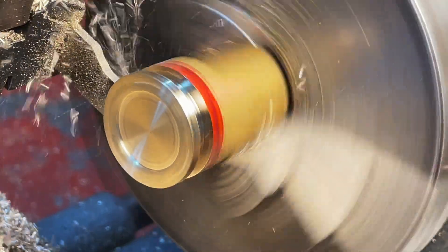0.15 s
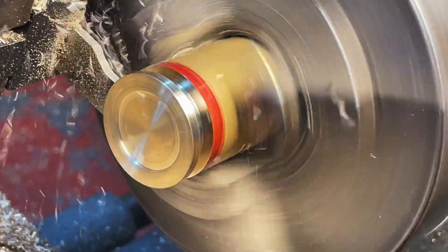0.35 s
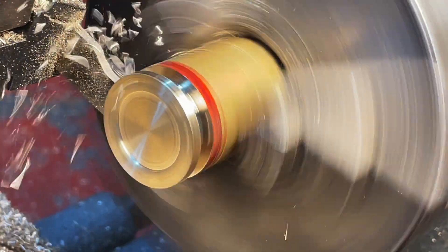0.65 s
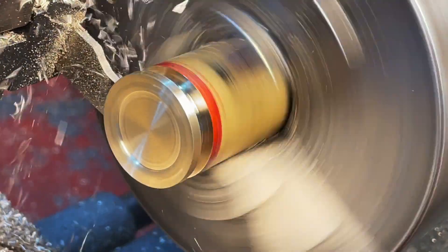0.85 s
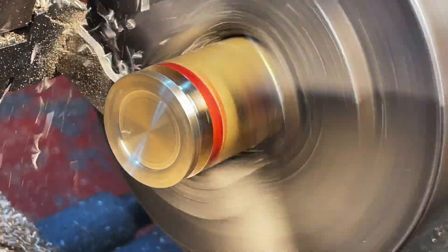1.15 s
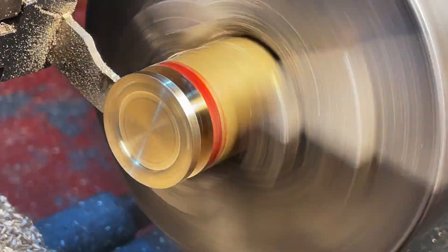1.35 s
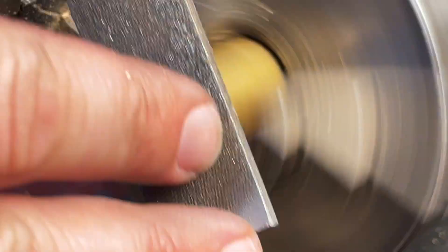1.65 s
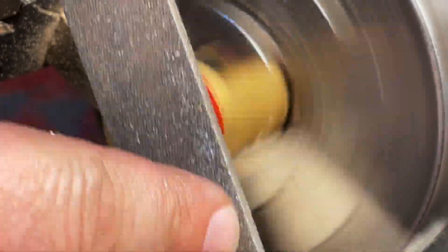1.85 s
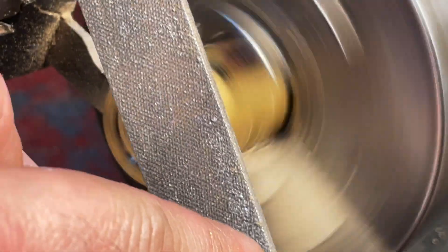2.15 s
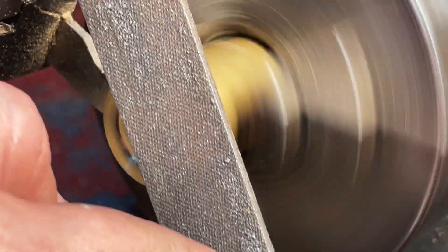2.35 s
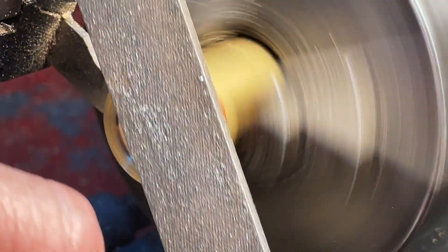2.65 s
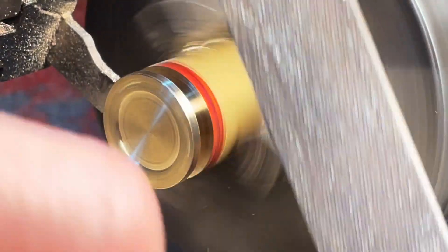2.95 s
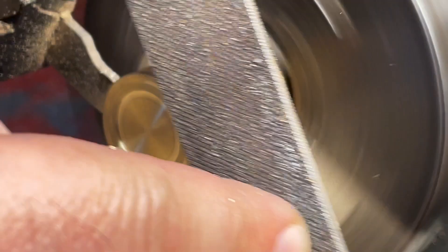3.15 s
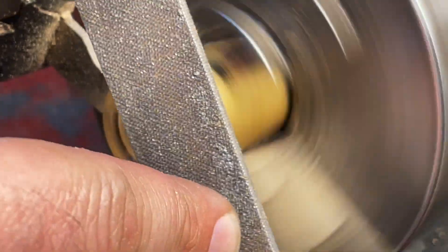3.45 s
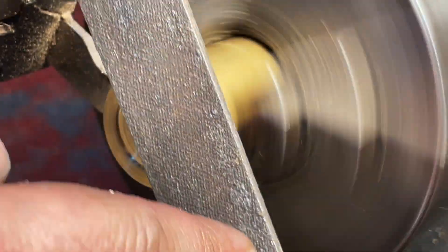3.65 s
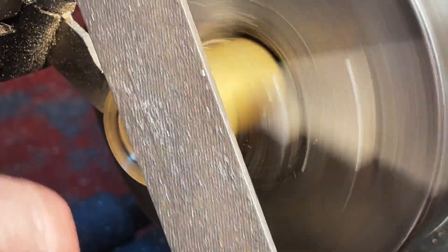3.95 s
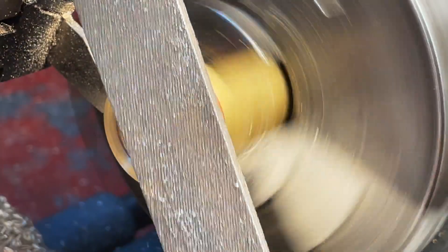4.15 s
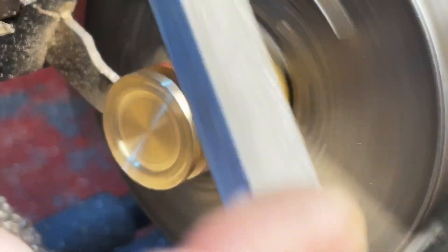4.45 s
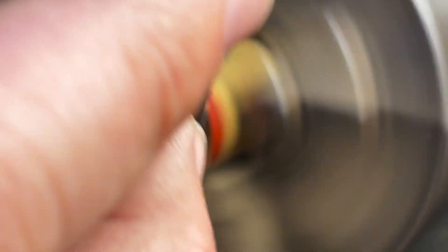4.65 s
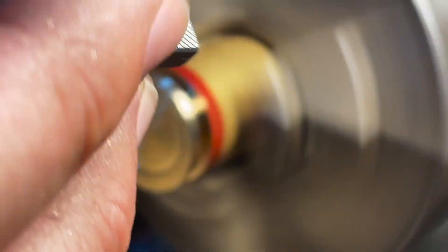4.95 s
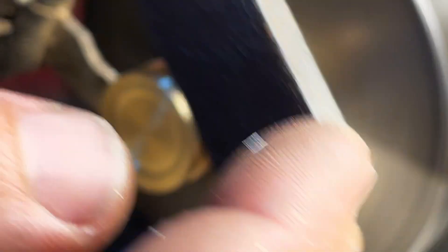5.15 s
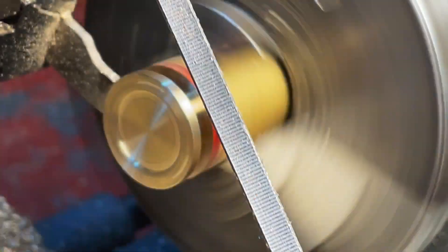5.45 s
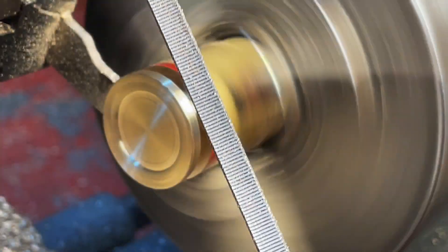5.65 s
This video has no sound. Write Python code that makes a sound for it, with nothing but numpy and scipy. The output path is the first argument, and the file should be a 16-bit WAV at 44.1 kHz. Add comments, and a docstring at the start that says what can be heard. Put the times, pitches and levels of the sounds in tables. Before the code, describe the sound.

Close up, a small lathe cuts a brass bar with a rapid juddering scrape, crackling chips and sputtering high squeal. At about 1.2 seconds the cutting stops abruptly. The machine runs on, humming and rumbling in pulses, with hard loose knocks, motor ticks and a thin whine. A fingertip brushes softly, then a file hisses twice, with brief steel clinks. Close stereo microphone in a workshop.

```python
"""A small metal lathe, close by. First a tool cuts a brass bar: juddering bites shape scraping noise about
32 times a second, snapping chips set off resonances, and the tool tip squeals as noise plus a wandering tone.
The cutting sound stops abruptly and the machine is heard alone: close tones beat as hum and rumble, the slack
drive knocks in short bursts, the motor ticks and whines over bearing noise. A fingertip brushes the bar in a soft
puff of noise; later a file is laid on twice with a fine, grainy hiss, and now and then struck steel rings."""
import sys
import numpy as np
from scipy import signal
from scipy.fft import rfft, irfft
from scipy.io import wavfile
from scipy.ndimage import uniform_filter1d

SR = 44100
rng = np.random.default_rng(int(sys.argv[2]) if len(sys.argv) > 2 else 0)


def persist_wave(psi):
    """Save psi, clipped to +-1, as 16-bit WAV."""
    counts = np.round(np.clip(psi, -1, 1) * 32767).astype(np.int16)
    wavfile.write(sys.argv[1], SR, np.atleast_2d(counts).T)


N = 255780
TIME = np.arange(N) / SR
FREQS = np.maximum(np.fft.rfftfreq(N, 1 / SR), 1)

# Table levels are taken before the gain of their layer; mode widths are noise bandwidths.
# scraping of the cut, heavy at first, easing and then biting again: (time [s], level [dB])
SCRAPE_LEVEL = [(0.0, -37), (0.165, -35.5), (0.195, -40), (0.28, -38.5), (0.34, -46), (0.448, -45),
                (0.535, -38.5), (1.085, -37.5), (1.132, -43.5), (1.168, -38), (1.21, -40.5)]
# colour of the scraping: (frequency [Hz], density [dB per Hz])
SCRAPE_COLOUR = [(130, -19), (185, -13), (218, 5.5), (250, -5), (285, -1), (340, -9.5), (500, -8.5),
                 (640, -5), (740, -10.5), (900, -6), (1150, -11.5), (1350, -12), (1650, -13), (2050, -13),
                 (3250, -24), (3850, -15), (5300, -26.5), (9000, -28), (11200, -26), (14000, -24.5)]
# drone of the frame under the cut: (time [s], level [dB])
DRONE_LEVEL = [(0.0, -38), (0.148, -38.5), (0.352, -41.5), (0.818, -35.5), (1.21, -40)]
# partials of the drone: (multiple of the judder, level [dB])
DRONE_PARTIALS = [(1, -42), (2, -33), (3, -15), (4, -13), (5, -2.5), (6, -24), (7, 2), (8, -18), (9, 0),
                  (10, -10.5), (11, -21), (12, -21), (13, -11.5), (14, -20.5)]
# a second bite halfway through the judder: (time [s], strength [0-1])
SECOND_BITE = [(0, 0.85), (.25, 0.4), (.5, 0.2)]
# extra level of some bites, from none to a few dB: (time [s], extra level [dB])
BITE_EXTRA = [(0.54, 1.5), (0.571, 1), (0.633, 0), (0.818, 2.5), (0.88, 2), (0.911, 3.5), (1.003, 3),
              (1.095, 1.5)]
# ringing of the tool post: (frequency [Hz], level [dB], t60 [s])
POST_MODES = [(410, -11, 0.06), (540, -5, 0.044), (636, 5.5, 0.039), (826, -2.5, 0.04), (912, -2, 0.07),
              (1314, 0.5, 0.042)]
# flank of the tool, rubbing on even where the cut eases: (frequency [Hz], width [Hz], level [dB])
FLANK_MODES = [(8950, 350, 10), (10270, 660, -3.5), (13500, 1100, -3)]
# crackle of the chips: (time [s], level [dB])
CHIP_LEVEL = [(0.0, -52), (0.03, -44), (0.246, -42), (0.35, -50), (0.444, -59), (0.538, -45.5),
              (0.768, -51), (0.824, -44), (0.828, -45), (1.186, -42.5), (1.21, -42)]
# resonances that the breaking chips set off: (frequency [Hz], width [Hz], level [dB])
CHIP_MODES = [(3808, 120, 7.5), (4350, 550, -0.5), (5700, 870, -3.5), (7260, 420, -1), (9900, 580, 5),
              (13600, 1200, -5.5)]
# thick chips snapping off: (time [s], peak [dB])
SNAPS = [(0.0313, -28.5), (0.064, -32), (0.1077, -31), (0.161, -35), (0.2028, -30), (0.247, -30),
         (0.2637, -30), (0.3855, -37), (0.4778, -34), (0.5407, -35), (0.5701, -37), (0.7552, -36),
         (0.7883, -30), (0.8175, -27), (0.8485, -37), (0.8792, -35), (0.913, -31), (1.0021, -29),
         (1.098, -28), (1.1743, -29), (1.187, -32)]
# squeal of the tool tip, flaring when a chip catches: (time [s], level [dB])
SQUEAL_LEVEL = [(0.0, -45), (0.046, -48), (0.084, -36), (0.11, -41), (0.116, -34.5), (0.13, -46),
                (0.148, -32.5), (0.217, -34), (0.232, -38.5), (0.262, -37), (0.278, -31), (0.31, -41.5),
                (0.322, -35.5), (0.33, -43.5), (0.416, -50.5), (0.43, -59), (0.552, -45), (0.582, -49),
                (0.684, -42), (0.706, -50), (0.784, -52), (0.792, -44), (0.852, -43.5), (1.01, -36.5),
                (1.054, -43.5), (1.138, -33), (1.148, -42.5), (1.21, -40)]
# the squeal shifts with the load on the tip: (time [s], frequency [Hz])
SQUEAL_PITCH = [(0.0, 6840), (0.12, 6850), (0.16, 6790), (0.21, 6730), (0.28, 6800), (0.35, 6760),
                (0.65, 6900), (1.0, 6810), (1.21, 6910)]
# resonances of the tool tip: (frequency [Hz], width [Hz], level [dB])
TOOL_MODES = [(4540, 1240, -28), (6440, 84, -8), (6730, 63, -4), (6700, 53, -1), (6870, 140, -2),
              (7100, 220, -3), (7500, 300, -6.5), (7800, 330, -13), (8280, 260, -28), (8980, 200, -3),
              (9300, 400, -22), (12600, 350, -19), (13340, 710, -14), (14200, 700, -28)]
# knocks that stand out: (time [s], level [dB], level above 2 kHz [dB], level below 900 Hz [dB],
# strength of the bounces [0-1])
HARD_KNOCKS = [(1.3865, -38, -55, -57, 0.7), (1.4404, -41.5, -46, -43, 0.8),
               (1.5344, -35.5, -44.5, -44, 0.8), (1.6951, -39.5, -57, -53, 0.5),
               (1.8343, -41, -57, -55, 0.5), (1.8653, -33.5, -45.5, -47, 0.9),
               (1.9261, -32.5, -44.5, -44, 0.8), (1.999, -39, -51, -44, 0.7), (2.074, -37, -49.5, -46, 0.9),
               (2.163, -39.5, -52, -56, 0.5), (2.237, -38.5, -56, -52, 0.5), (2.315, -43, -43, -52, 0.4),
               (2.325, -35, -56, -58, 0.2), (2.3569, -32.5, -50, -44, 1), (2.5054, -35, -49.5, -52, 0.6),
               (2.6443, -36, -54, -45, 1), (2.804, -35.5, -43, -51, 0.46), (2.8675, -35, -46, -56, 0.9),
               (2.9647, -36, -46, -46, 1), (3.255, -36.5, -45, -50, 0.7), (3.475, -37, -59, -51, 0.6),
               (3.595, -38.5, -52, -56, 0.65), (3.6142, -35, -51.5, -46, 0.5),
               (3.7457, -37, -54.5, -52, 0.6), (3.8024, -40, -45, -50, 0.8), (3.873, -36, -52, -59, 0.7),
               (3.8936, -33.5, -40, -50, 0.55), (4.0916, -31, -48, -39, 0.8),
               (4.202, -39.5, -58, -51, 0.55), (4.3505, -36, -41, -41, 0.6), (4.414, -32, -48, -48, 0.7),
               (4.5121, -36, -61, -47, 0.6), (4.565, -36, -55, -38, 0.54), (4.691, -31, -49, -43, 0.7),
               (4.7443, -34, -47, -48, 0.3), (4.8309, -30.5, -50, -51, 0.4), (4.897, -42, -51, -55, 0.4),
               (4.9829, -34, -44, -52.5, 0.5), (5.044, -37, -47, -49.5, 0.6),
               (5.1326, -37.5, -40.5, -53, 0.5), (5.1621, -35, -47.5, -46, 0.7),
               (5.1921, -30.5, -44, -32.5, 0.5), (5.28, -33.5, -49, -46, 1),
               (5.371, -34.5, -41.5, -40, 0.7), (5.471, -36.5, -55.5, -58, 0.5),
               (5.5027, -35.5, -42, -52, 0.8), (5.5324, -37.5, -43, -39, 0.5),
               (5.6201, -32.5, -43, -53, 0.4), (5.6503, -35, -57, -42, 0.6), (5.6833, -34.5, -44, -38, 0.9),
               (5.7698, -37, -44, -51, 0.6)]
# resonances of the headstock: (frequency [Hz], width [Hz], level [dB])
KNOCK_MODES = [(552, 120, -1), (841, 82, 2), (1070, 73, -1), (1271, 118, 3), (1505, 250, -3),
               (1880, 130, -0.5), (2252, 370, -6.5), (2850, 420, -13), (4310, 740, -15.5)]
# strokes of the file: (start [s], loudest [s], end [s], level when loudest [dB],
# rise [dB per s], fall [dB per s])
STROKES = [(2.209, 2.708, 2.79, -50.5, 33, 270), (3.519, 4.0, 4.145, -50, 17, 65)]
# the louder colour of the file hiss: (frequency [Hz], density [dB per Hz])
LOUD_HISS_COLOUR = [(3000, -38), (4300, -6), (6000, -10), (8000, -12), (10000, -2), (12000, -23),
                    (12800, -5), (13400, -13), (13900, 4), (14500, 2), (15600, -2)]
# the fainter colour of the file hiss: (frequency [Hz], width [Hz], level [dB])
FAINT_HISS_MODES = [(5950, 3200, -14.5), (13740, 920, 1)]
# the blade of the file humming along: (frequency [Hz], width [Hz], level [dB])
BLADE_MODES = [(276, 31, -1.5), (398, 110, -7)]
# bumps of a steel tool: (time [s], click level [dB])
CLINKS = [(2.3575, -44.5), (2.965, -47.5), (4.691, -47), (5.191, -37)]
# ringing of the steel tool: (frequency [Hz], level [dB], t60 [s])
STEEL_MODES = [(418, -8.5, 0.18), (577, 0, 0.03), (818, 0.5, 0.036), (1310, -12, .04), (1985, -5.5, 0.18)]
# mains hum and the turning parts that beat against it: (frequency [Hz], level [dB])
HUM = [(100.1, 0), (106.49, -5), (109.94, -11), (112.88, -14), (107.9, -13), (92.3, -16), (96.75, -17),
       (103.4, -18)]
# close tones of the low rumble: (frequency [Hz], level [dB])
RUMBLE = [(50.75, -2), (54.68, 0), (75.3, -14), (74.2, -16)]
# the rumble rolls unevenly: (time [s], level [dB])
RUMBLE_LEVEL = [(1.38, -43), (1.65, -47), (1.92, -41), (2.42, -41.5), (2.66, -41.5), (2.92, -46.5),
                (3.15, -39), (3.42, -41), (3.7, -46), (3.98, -42.5), (4.45, -47), (4.8, -42.5),
                (5.2, -44.5), (5.5, -39.5), (5.75, -43)]
# faint overtones of the motor and the mains: (frequency [Hz], level against the hum [dB])
OVERTONES = [(124.9, -20), (131.3, -23), (200.3, -22), (213, -24), (225.3, -21), (300.4, -25)]
# resonances of the bed and guards: (frequency [Hz], width [Hz], level [dB])
FRAME_MODES = [(30, 14, -12.5), (83, 22, 1.5), (105, 7.8, -8.5), (146, 26, -1), (219.3, 28.4, 1),
               (289, 23, -8), (408.6, 30.5, -8), (824, 87, -14.5)]
# colour of the bearing noise: (frequency [Hz], density [dB per Hz])
BEARING_COLOUR = [(300, -1), (400, -8.5), (550, -3), (830, 0), (1050, -7.5), (1300, -5.5), (2000, -13),
                  (2900, -17), (4300, -18), (4900, -22), (5700, -18), (7500, -19.5), (10000, -23.5),
                  (11000, -35.5), (12500, -38), (15500, -44)]
# whine of the motor drive: (frequency [Hz], level [dB], side tone share [gain], flutter [rad])
WHINE = [(4369.6, -64.5, .75, .3), (5462, -63, .28, .65), (6554.4, -73.5, .55, .5)]
# ticks of the motor that stand out: (time [s], peak [dB])
HARD_TICKS = [(1.529, -57), (1.6305, -51.0), (1.6858, -52), (1.7259, -50), (1.7661, -44), (1.8067, -51),
              (1.8867, -50.0), (2.0692, -49.5), (2.3283, -54), (2.7746, -50), (2.8546, -53),
              (2.8946, -50.0), (2.9346, -45), (3.0155, -50), (3.055, -51), (3.135, -48.5), (3.9829, -52),
              (4.1029, -48.0), (4.1838, -52), (4.2625, -50.5), (4.287, -48.0), (4.304, -54), (4.3441, -50),
              (4.3848, -47), (4.5844, -50.5), (4.6257, -49), (4.7056, -46.0), (5.2316, -47), (5.2713, -51),
              (5.3118, -50), (5.3517, -44), (5.3762, -42), (5.3915, -45.5), (5.5531, -46), (5.593, -48),
              (5.6325, -47.5)]
# left-right likeness of the noise: (frequency [Hz], likeness [0-1])
LIKENESS = [(60, 1), (290, 0.99), (640, 0.69), (1410, 0.31), (2200, 1), (15000, 1)]
# phase between left and right: (frequency [Hz], phase [rad])
STEREO_PHASE = [(4900, 0), (5900, -1.3), (7600, -2.9), (9600, -3.4), (10500, -4.7), (11100, -6.2),
                (14200, -6.5), (15400, -8.0)]
# level between left and right: (frequency [Hz], left minus right [dB])
STEREO_LEAN = [(100, 0), (280, -2), (600, -1), (1300, 1), (2200, 0)]

# when the cutting sound stops abruptly, one moment at which the tool bites, and the mean judder rate
CUT_STOP_S, BITE_S, JUDDER_HZ = 1.216, .818, 32.44
# one bite, in judders: rise and decay; then the share of rubbing that goes on between bites
BITE_RISE, BITE_DECAY, RUB = .07, .21, .12
FLANK_DB = -40.5
SMALL_SNAPS_PER_S = 170   # between bites; more as the edge digs in

# the running machine: levels up to SETTLED_S, then a steady growth
SETTLED_S = 1.3
HUM_DB, HUM_RISE_DB_PER_S = -43, 1.28
BEARING_DB, BEARING_RISE_DB_PER_S = -53.5, 0.97
HUM_CREST_S, RUMBLE_CREST_S = 4.988, 3.44   # moments at which the beats swell
BEAT_HZ = HUM[1][0] - HUM[0][0]

# slack in the drive rattles on every beat of the hum, from just ahead of its crest
KNOCK_LEAD_S, RATTLE_S, KNOCK_RISE_DB_PER_S = .014, .11, 1.5
KNOCK_DECAY_S, BOUNCE_S = 0.0041, 0.01   # one contact; the mean gap between bounces
KNOCK_CRACK = 8   # height of the first impact against the grit after it

# motor: turning rate, the moment of one tick, and the colour and level of the ticks
MOTOR_HZ, MOTOR_TICK_S = 24.843, 5.3505
TICK_HZ, TICK_WIDTH_HZ = 3550, 480
TICK_DB = -15.5   # against the bearings
TICK_RUN_S, TICK_CREST_S = 1.21, 4.38   # the ticks come in runs that swell and fade

FINGER_S, FINGER_HALF_LENGTH_S, FINGER_DB = 1.53, 0.041, -53.5
CUTOFF_HZ = 15750


def cutting(post_gain_db=-5.0, waver_db=1.0, uneven_db=1.0, jitter=0.0046, post_lag=0.1884):
    """The tool bites once a judder: chips tear off, brass scrapes, the tool post rings, the frame drones."""
    turns = JUDDER_HZ * (TIME - BITE_S)
    drone = sum(from_db(db + waver_db * drift(8.0)) * np.sin(2 * np.pi * (multiple * turns + rng.random()))
                for multiple, db in DRONE_PARTIALS)

    # the cut starts with two bites a judder, then settles towards one
    ages = (turns + jitter * drift(20.5) - np.array([[0], [.5]])) % 1   # judders since each bite
    strength = np.array([np.ones(N), in_time(SECOND_BITE)]) * from_db(uneven_db * drift(30))
    extra_db = sum(db * between(s - .003, s + .75 / JUDDER_HZ, .003) for s, db in BITE_EXTRA)
    strength *= from_db(extra_db)
    shape = (1 - np.exp(-ages / BITE_RISE)) * np.exp(-ages / BITE_DECAY)
    bite = RUB + np.sum(strength * shape, axis=0)
    bite /= np.sqrt(uniform_filter1d(bite ** 2, SR // 8))   # evens out the loudness over 1/8 s
    scrape = coloured(noise() * bite, SCRAPE_COLOUR)

    # the heavy tool post is jolted a little after each bite
    wraps = np.diff((ages - post_lag) % 1, prepend=0) < -.5
    jolts = np.sum(strength * wraps, axis=0)
    post = rms_one(sum(ring(jolts * from_db(2 * drift(28)), [mode]) for mode in POST_MODES))

    sound = from_db(in_time(DRONE_LEVEL)) * rms_one(drone) + chips(turns) + squeal()
    sound += from_db(FLANK_DB) * rms_one(resonate(noise(), FLANK_MODES))
    sound += from_db(in_time(SCRAPE_LEVEL)) * (from_db(post_gain_db) * post + scrape)
    return sound * between(-1, CUT_STOP_S, .008)


def chips(turns, gain_db=0.5, snap=0.72, snap_width=0.041, grain_db=1.5, clump_db=3.0):
    """Brittle chips crackle, thickest just as the edge digs in: fine dust and separate small snaps."""
    from_bite = (turns + .5) % 1 - .5   # judders to the nearest bite
    digging = 1 + snap * np.exp(-(from_bite / snap_width) ** 2)
    dust = noise() * digging * from_db(grain_db * drift(1000) + clump_db * drift(85))
    breaks = rng.random(N) < SMALL_SNAPS_PER_S * digging / SR
    small = breaks * rng.choice([-1, 1], N) * rng.uniform(.5, 2, N)
    crackle = rms_one(resonate(rms_one(dust) + rms_one(small), CHIP_MODES))
    return from_db(in_time(CHIP_LEVEL) + gain_db) * crackle


def squeal(hiss_gain_db=10.0, tone_gain_db=5, flicker_db=2.0, tone_flicker_db=3, wander_hz=65,
           octave_db=-13, lock=0.42):
    """The tool tip hisses in its resonances; driven hard, it locks into a sputtering, wandering tone."""
    level_db = in_time(SQUEAL_LEVEL)
    hiss = rms_one(resonate(noise() * from_db(flicker_db * drift(90)), TOOL_MODES))
    phase = 2 * np.pi * np.cumsum(in_time(SQUEAL_PITCH) + wander_hz * drift(113)) / SR
    wave = np.sin(phase) + from_db(octave_db) * np.sin(2 * phase)
    tone = rms_one(from_db(tone_flicker_db * drift(90)) * wave)
    locked_db = tone_gain_db + lock * (level_db - level_db.max())   # the tone gains on the hiss when loud
    return from_db(level_db) * (from_db(hiss_gain_db) * hiss + from_db(locked_db) * tone)


def snaps(gain_db=3.0, decay_s=.002, crack=0.59, spread=0.035, colour_db=3.5, body_db=-2):
    """Each thick chip cracks at its own pitch and jars the tool holder."""
    out = np.zeros(N)
    for s, peak_db in SNAPS:
        modes = [(hz * (1 + spread * rng.standard_normal()), width, db + colour_db * rng.standard_normal())
                 for hz, width, db in CHIP_MODES]
        holder = (1990, 2100, body_db)
        add(out, s, from_db(peak_db + gain_db) * strike(modes + [holder], decay_s, crack))
    return out


def knocks(knock_gain_db=-10.0, tail=0.26, tail_decay_s=0.034, ragged_db=2.5, treble_share=0.89,
           bass_share=0.8, colour_db=2.5, edge_db=-22, count=3):
    """A crack and a short burst drive the headstock, then a few loose bounces and a ragged tail."""
    out = np.zeros((2, N + SR))
    age = TIME[:2 ** 12]
    grit = np.pad(noise(), ((0, 0), (0, SR)))
    ragged = np.pad(rms_one(from_db(ragged_db * drift(130))), (0, SR))
    for s, level_db, treble_db, bass_db, bounce in knock_pattern():
        start = round(s * SR)
        span = slice(start, start + len(age))
        since = age - np.cumsum(BOUNCE_S * (.5 + rng.random((count, 1))), axis=0)   # from each bounce
        bounces = np.sum((since > 0) * np.exp(-np.abs(since) / KNOCK_DECAY_S), axis=0)
        loose = (bounce * bounces + tail * ragged[span]) * np.exp(-age / tail_decay_s)
        force = grit[:, span] * (np.exp(-age / KNOCK_DECAY_S) + loose)
        force[:, 0] += KNOCK_CRACK
        # where the blow lands decides whether the upper or the lower modes ring
        modes = [(2000, 2200, edge_db)]
        for hz, width, db in KNOCK_MODES:
            tilt_db = treble_share * treble_db * (hz > 2000) + bass_share * bass_db * (hz < 900)
            modes.append((hz, width, db + colour_db * rng.standard_normal() + tilt_db))
        knock = resonate(force, modes)
        out[:, span] += from_db(level_db + knock_gain_db) * knock / np.std(knock[:, :SR // 100])
    return out[:, :N]


def knock_pattern(rattle_db=-46, rattle_spread_db=2.5, colour_db=4, rattle_bounce=0.33, count=3):
    """Hard knocks, and a light rattle on each beat: (time [s], level, treble, bass [dB], bounce [0-1])."""
    hard_s, hard_db, treble_db, bass_db, bounce = np.transpose(HARD_KNOCKS)
    bright_db, deep_db = treble_db - hard_db, bass_db - hard_db
    hard = list(zip(hard_s, hard_db, bright_db - bright_db.mean(), deep_db - deep_db.mean(), bounce))

    crests = np.arange(HUM_CREST_S % (1 / BEAT_HZ), TIME[-1], 1 / BEAT_HZ)
    beats = np.repeat(crests[crests > CUT_STOP_S - RATTLE_S], count) - KNOCK_LEAD_S
    times = beats + RATTLE_S * rng.random(len(beats))
    rattle = []
    for s, (force, high, low) in zip(times, rng.standard_normal((len(beats), 3))):
        # a hard knock uses up the slack: no lighter one falls close to it
        if np.abs(hard_s - s).min() > .03:
            level_db = rattle_db + KNOCK_RISE_DB_PER_S * (s - SETTLED_S) + rattle_spread_db * force
            rattle.append((s, level_db, colour_db * high, colour_db * low, rattle_bounce))
    return hard + rattle


def filing(faint_db=2, loud_db=2.5, blade_db=-5, grain_db=2.5, flicker_db=2.0):
    """Fine teeth shave brass in a grainy hiss that swells and fades, the blade hums; a fingertip rubs duller."""
    level = 0
    for start, loudest, end, db, rise_db_per_s, fall_db_per_s in STROKES:
        below_db = np.maximum(rise_db_per_s * (loudest - TIME), fall_db_per_s * (TIME - loudest))
        level = level + from_db(db - below_db) * between(start, end, .006)
    rubbing = noise() * from_db(grain_db * drift(700) + flicker_db * drift(40))

    # two colours of the file hiss, a fainter one and a louder one; the level fades between them
    blend = level / level.max()
    faint = from_db(faint_db) * rms_one(resonate(rubbing, FAINT_HISS_MODES))
    loud = from_db(loud_db) * coloured(rubbing, LOUD_HISS_COLOUR)
    blade = from_db(blade_db) * rms_one(resonate(rubbing, BLADE_MODES))
    stroke = np.sqrt(blend) * loud + np.sqrt(1 - blend) * faint + blade

    skin = coloured(noise(), [(1200, 1), (5000, -6), (10000, -11), (15000, -24)])
    touch = from_db(FINGER_DB) * np.exp(-((TIME - FINGER_S) / FINGER_HALF_LENGTH_S) ** 2)
    return level * stroke + touch * skin


def clinks():
    """A bumped steel tool rings briefly in damped modes."""
    clicks = np.zeros(N)
    for s, click_db in CLINKS:
        clicks[round(s * SR)] = from_db(click_db)
    return ring(clicks, STEEL_MODES)


def machine(buzz_db=-16.5, frame_gain_db=-10.0, loaded_db=-24, loaded_hum_db=-5, throb_db=1.0, grain_db=1.5):
    """Motor and belt hum and rumble in beating tones; the frame rustles and the bearings throb with the beat."""
    loaded = between(-1, CUT_STOP_S, .05)   # the cut takes up the slack and damps the rumble
    rumble_db = in_time(RUMBLE_LEVEL) + loaded_db * loaded
    rumble = from_db(rumble_db) * beating(RUMBLE, RUMBLE_CREST_S).real

    swell = beating(HUM, HUM_CREST_S)
    # on each swell the guards buzz an octave higher: squaring doubles the phase
    octave = (swell ** 2 / (np.abs(swell) + .1)).real
    hum = swell.real + from_db(buzz_db) * rms_one(resonate(octave, [(226, 58, 0)]))
    for hz, db in OVERTONES:
        sine = np.sqrt(2) * np.sin(2 * np.pi * (hz * TIME + rng.random()))
        hum += from_db(db + 2 * drift(7.9)) * sine
    frame = from_db(frame_gain_db) * rms_one(resonate(noise(), FRAME_MODES))
    hum_db = growing(HUM_DB, HUM_RISE_DB_PER_S) + loaded_hum_db * loaded

    beat = np.cos(2 * np.pi * BEAT_HZ * (TIME - HUM_CREST_S))
    rough = noise() * from_db(throb_db * beat + grain_db * drift(37))
    bearing_db = growing(BEARING_DB, BEARING_RISE_DB_PER_S)
    bearings = from_db(bearing_db) * coloured(rough, BEARING_COLOUR)
    return rumble + from_db(hum_db) * (hum + frame) + bearings


def beating(lines, crest_s):
    """Close tones swell together at one moment, then drift in and out of step; complex, real part rms one."""
    start = rng.random()
    tones = 0
    for hz, db in lines:
        cycles = hz * (TIME - crest_s) + start + 0.018 * drift(5.6)
        tones = tones + from_db(db) * np.exp(2j * np.pi * cycles)
    return tones / np.std(tones.real)


def motor(tick_decay_s=0.002, second_share=0.27, uneven_db=2.5, swell_db=2.5, whine_gain_db=-0.44):
    """A light tick every turn, a weaker one 0.62 of a turn later, and the whine of the drive."""
    age = ((TIME - MOTOR_TICK_S) * MOTOR_HZ - np.array([[0], [.62]])) % 1 / MOTOR_HZ
    first, second = np.exp(-age / tick_decay_s)
    run = np.cos(2 * np.pi * (TIME - TICK_CREST_S) / TICK_RUN_S)
    force = (first + second_share * second) * from_db(swell_db * run + uneven_db * drift(16))
    ticks = rms_one(resonate(noise() * force, [(TICK_HZ, TICK_WIDTH_HZ, 0)]))
    # the ticks grow with the noise of the bearings
    tick_db = growing(BEARING_DB, BEARING_RISE_DB_PER_S) + TICK_DB

    # the rectified supply makes the whine buzz: a side tone one hum frequency above each line
    ripple = np.exp(2j * np.pi * HUM[0][0] * TIME)
    whine, sway = 0, drift(3.9)
    for hz, db, share, flutter in WHINE:
        wobble = flutter * (2 * sway + drift(38))   # the speed sways and flutters
        level = from_db(db + whine_gain_db + 1.5 * drift(30))
        tone = level * np.exp(1j * (2 * np.pi * hz * TIME + wobble))
        whine = whine + (tone * (1 + share * ripple)).real
    return from_db(tick_db) * ticks + whine


def hard_ticks(gain_db=7, decay_s=0.0013, crack=1.6, spread=.04, click_db=-11, click_spread_db=4):
    """The stronger ticks differ in pitch and in how much broad click they carry."""
    out = np.zeros(N)
    for (s, peak_db), (pitch, edge) in zip(HARD_TICKS, rng.standard_normal((len(HARD_TICKS), 2))):
        tick = (TICK_HZ * (1 + spread * pitch), TICK_WIDTH_HZ, 0)
        click = (2800, 2600, click_db + click_spread_db * edge)
        add(out, s, from_db(peak_db + gain_db) * strike([tick, click], decay_s, crack))
    return out


def growing(db, rise_db_per_s):
    """A level in dB that climbs steadily once the machine has settled."""
    return db + rise_db_per_s * np.maximum(TIME - SETTLED_S, 0)


def strike(modes, decay_s, crack):
    """One small contact: an instant crack and a short burst of grit into some resonances; peak one."""
    age = TIME[:2 ** 11]
    burst = rng.standard_normal(len(age)) * np.exp(-age / decay_s)
    burst /= np.linalg.norm(burst)
    burst[0] += crack
    hit = resonate(burst, modes)
    return hit / np.abs(hit).max()


def ring(clicks, modes):
    """Each click sets damped sines (frequency [Hz], level [dB], t60 [s]) going."""
    age = TIME[:SR // 4]
    response = sum(from_db(db - 60 * age / t60) * np.sin(2 * np.pi * hz * age) for hz, db, t60 in modes)
    return signal.fftconvolve(clicks, response)[:N]


def resonate(x, modes):
    """Steep resonances that add in power; minimum phase, so nothing rings early."""
    size = x.shape[-1]
    freqs = np.fft.rfftfreq(size, 1 / SR)
    power = sum(from_db(2 * db) / (1 + ((freqs - hz) * np.pi / 2 / width) ** 2) ** 2
                for hz, width, db in modes)
    # folding the cepstrum onto positive times gives the minimum phase
    cepstrum = irfft(np.log(power + 1e-12) / 2, size)
    cepstrum[1:size // 2] *= 2
    cepstrum[size // 2 + 1:] = 0
    return irfft(rfft(x) * np.exp(rfft(cepstrum)), size)


def coloured(x, spectrum):
    """Give a sound a spectrum that falls away below its first point; rms one."""
    skirt = 1 / np.sqrt(1 + (spectrum[0][0] / FREQS) ** 8)
    return rms_one(irfft(rfft(x) * from_db(at_hz(spectrum)) * skirt, N))


def noise():
    """White stereo noise, less alike where the workshop echoes most."""
    alike = np.clip(at_hz(LIKENESS), 0, 1)
    mid, side = rfft(rng.standard_normal((2, N)))
    return rms_one(irfft(np.sqrt(1 + alike) * mid + np.sqrt(1 - alike) * side * [[1], [-1]], N))


def drift(rate_hz):
    """Smooth random wandering up to about a rate; rms one."""
    return rms_one(irfft(rfft(rng.standard_normal(N)) / (1 + (FREQS / rate_hz) ** 4), N))


def between(start, end, fade):
    """One from start to end, with short ramps; all in seconds."""
    return np.clip((TIME - start) / fade + .5, 0, 1) * np.clip((end - TIME) / fade + .5, 0, 1)


def in_time(curve):
    """A curve over time, read at every sample."""
    s, value = np.transpose(curve)
    return np.interp(TIME, s, value)


def at_hz(points):
    """A table over frequency, read on a log axis."""
    hz, value = np.transpose(points)
    return np.interp(np.log(FREQS), np.log(hz), value)


def from_db(db):
    """Decibels to gain."""
    return 10 ** (np.asarray(db) / 20)


def rms_one(x):
    """Scale to unit rms."""
    return x / np.sqrt(np.mean(x ** 2) + 1e-20)


def add(out, s, sound):
    """Mix a short sound in at a time in seconds."""
    start = round(s * SR)
    out[start:start + len(sound)] += sound[:N - start]


def scene():
    """The lathe and the work done on it."""
    work = cutting() + snaps() + knocks() + filing() + clinks()
    return work + machine() + motor() + hard_ticks()


def record(dry):
    """Left and right differ a little in level and, in the treble, in phase; the top is cut."""
    # half of the log gain and of the phase goes to each side
    half_difference = at_hz(STEREO_LEAN) * np.log(10) / 40 + .5j * at_hz(STEREO_PHASE)
    stereo = irfft(rfft(dry) * np.exp(half_difference * [[1], [-1]]), N)
    return signal.sosfilt(signal.ellip(12, .1, 90, CUTOFF_HZ, fs=SR, output="sos"), stereo)


dry = scene()
out = record(dry)
persist_wave(out)
```